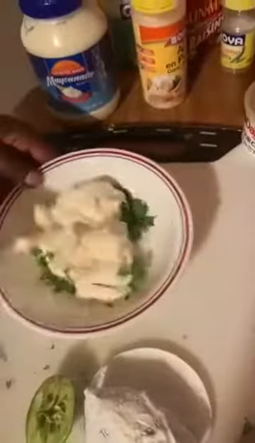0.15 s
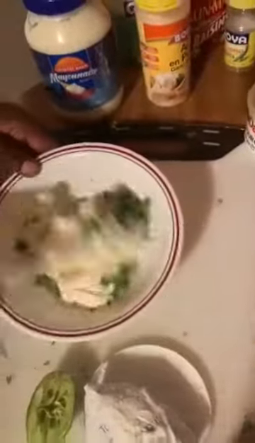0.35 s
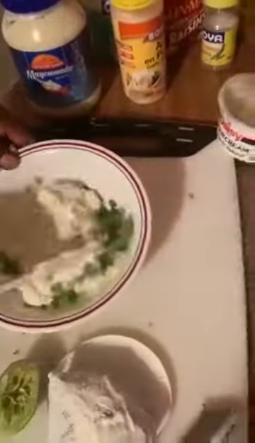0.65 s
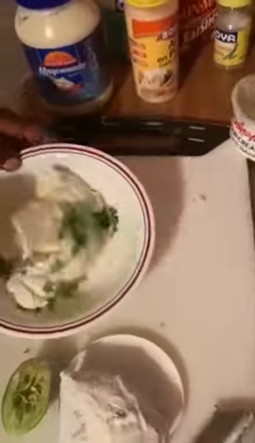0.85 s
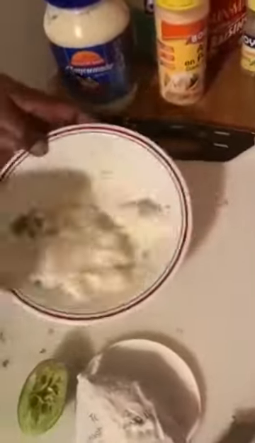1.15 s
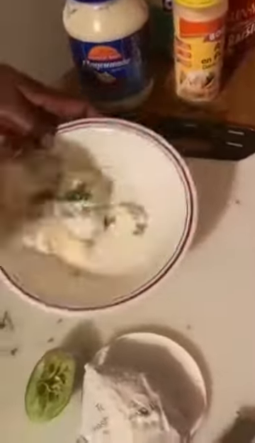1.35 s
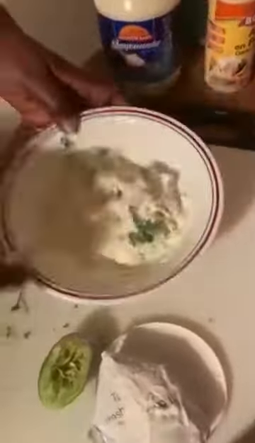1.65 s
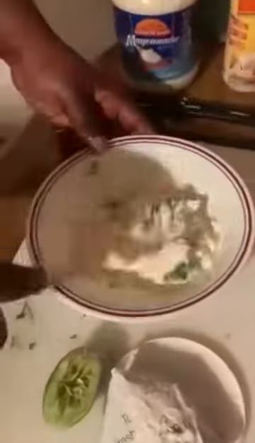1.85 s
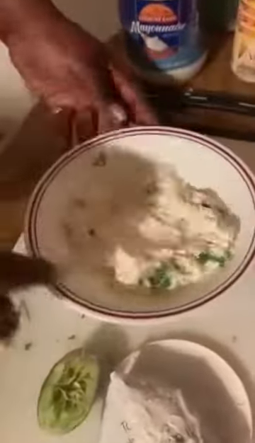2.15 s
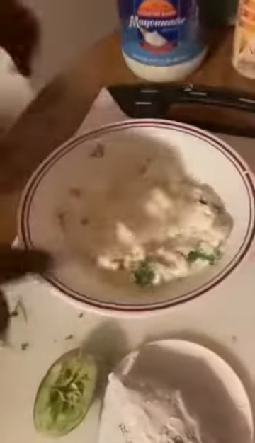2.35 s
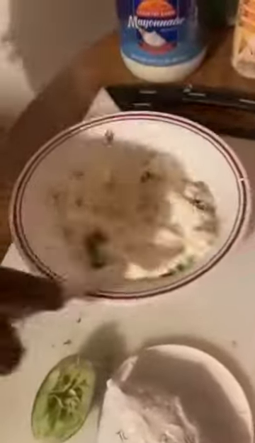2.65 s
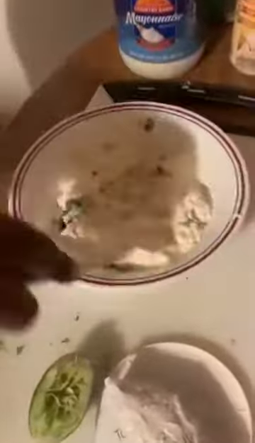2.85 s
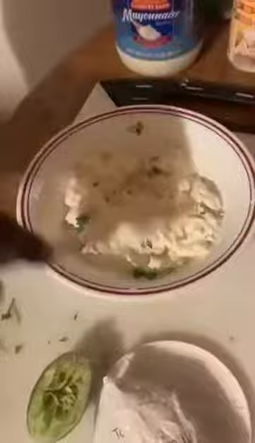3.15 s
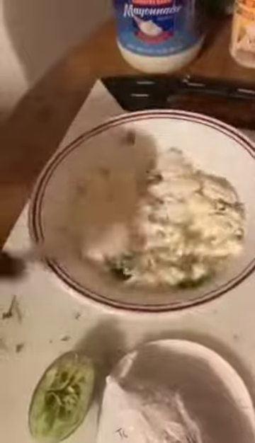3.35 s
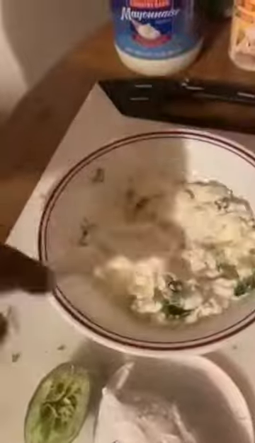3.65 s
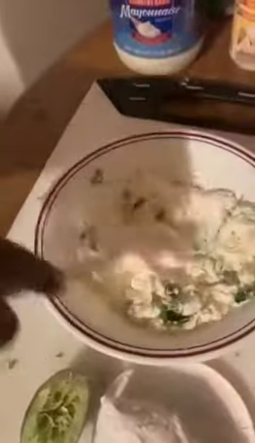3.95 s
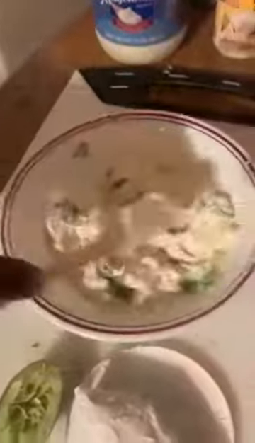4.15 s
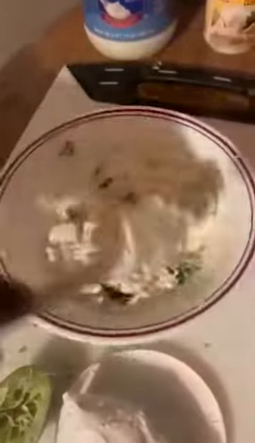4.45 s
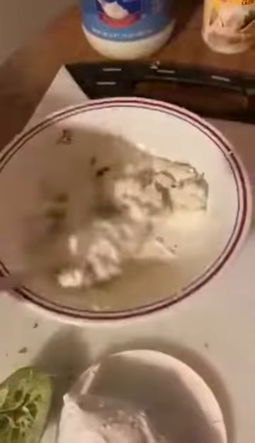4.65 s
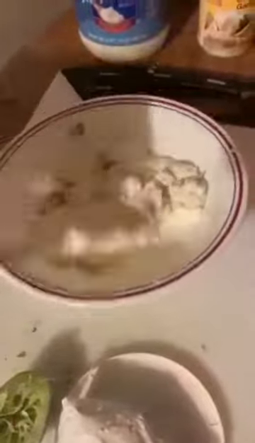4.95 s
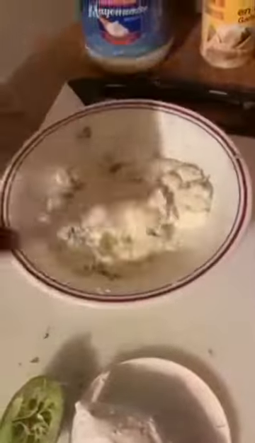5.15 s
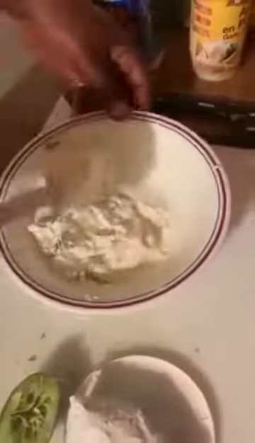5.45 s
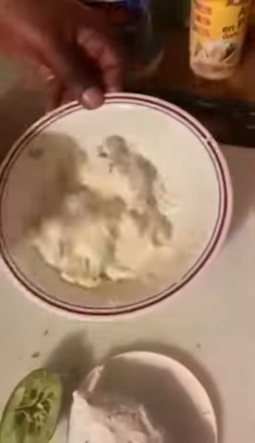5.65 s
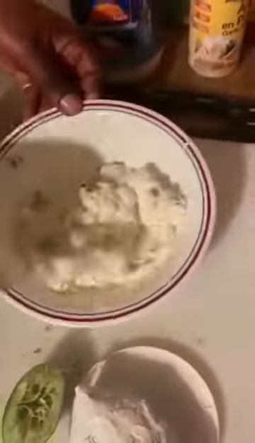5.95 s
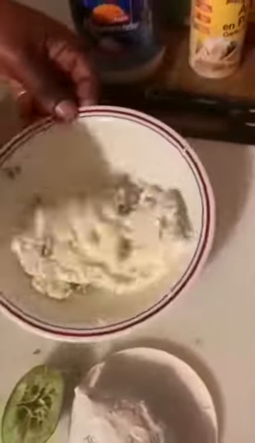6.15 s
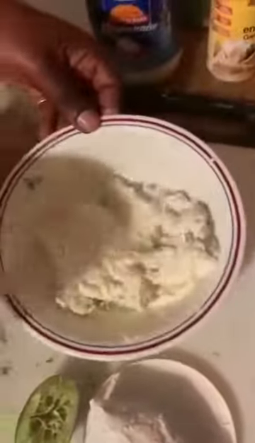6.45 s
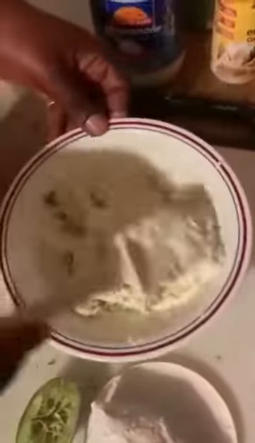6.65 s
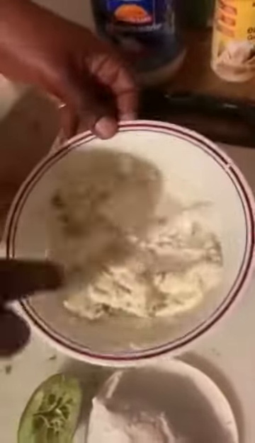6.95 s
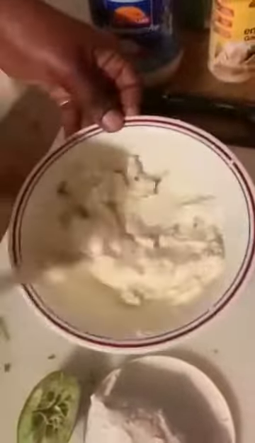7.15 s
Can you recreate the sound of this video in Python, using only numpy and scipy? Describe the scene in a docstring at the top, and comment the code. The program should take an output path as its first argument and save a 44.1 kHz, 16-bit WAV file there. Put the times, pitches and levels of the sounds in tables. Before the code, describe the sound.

A plastic spoon stirs thick creamy mixture in a ceramic bowl, wet crackles and smacks, with bowl knocks and scrapes over a faint appliance hum.

```python
"""In a small kitchen a plastic spoon stirs thick mayonnaise in a ceramic bowl, close to a camera.
An appliance hums: unsteady low tones over shaped noise. The bowl rocks and shuffles on a cutting board:
decaying modes and juddering noise. The spoon taps and scrapes the wall, exciting its damped resonances.
The cream crackles and smacks: swarms of tiny damped sines and the short ring of bursting air pockets."""
import sys
import numpy as np
from scipy import signal
from scipy.fft import rfft, irfft, next_fast_len
from scipy.io import wavfile
from scipy.ndimage import map_coordinates

SR = 44100
rng = np.random.default_rng(int(sys.argv[2]) if len(sys.argv) > 2 else 0)


def pcm_store(signal):
    """Save signal as 16-bit PCM."""
    levels = np.round(np.clip(np.atleast_2d(signal), -1, 1) * 32767)
    wavfile.write(sys.argv[1], SR, levels.astype(np.int16).T)


N = 322371
TOP_HZ = 12100  # band limit of the camera, also the highest mode of an air pocket

# resonances of the bowl wall, damped by the cream: pitch_hz, level_db, t60_s
WALL_MODES = [(1147, -6, 0.022), (1600, -4.5, 0.024), (1933, -10, 0.033), (2580, -14.5, 0.014),
              (3165, -8, 0.063), (3600, -2.5, 0.013), (4830, -3.5, 0.019), (7030, 2.5, 0.028),
              (8300, -10.5, 0.008), (10300, -2, 0.016)]
# spectrum of sheared cream: frequency_hz, density_db (per Hz, relative)
CREAM_SPECTRUM = [(350, -42), (600, -13), (807, -15), (2630, -10), (3870, -6.5), (5080, -11), (7860, -19),
                  (9780, -24), (11400, -11.5), (13000, -40.5), (16900, -71), (22000, -120)]


def amp(db):
    """Level in decibels to amplitude ratio."""
    return 10 ** (np.asarray(db) / 20)


def unit(x):
    """Normalise to an rms of 1."""
    return x / np.sqrt(np.mean(x ** 2) + 1e-20)


def along(points, hz):
    """Interpolate (Hz, value) points on a logarithmic frequency axis."""
    f, v = np.transpose(points)
    return np.interp(np.log(hz + 1), np.log(np.abs(f) + 1), v)


def wobble(rate):
    """Slow random modulation: a smooth curve through rate random knots a second."""
    knots = rng.standard_normal(int(N * rate / SR) + 4)
    return map_coordinates(knots, [np.arange(N) * rate / SR])


def filtered(x, response):
    """Linear filtering: multiply the spectrum by a response of frequency."""
    n = x.shape[-1]
    m = next_fast_len(n + 4096)
    return irfft(rfft(x, m) * response(np.fft.rfftfreq(m, 1 / SR)), m)[..., :n]


def coloured(x, spectrum):
    """Spectral shaping: weight x by (Hz, dB) points, then bring it to an rms of 1."""
    return unit(filtered(x, lambda hz: amp(along(spectrum, hz))))


def add(track, s, x):
    """Superposition: mix x into the track from time s."""
    part = track[max(round(s * SR), 0):][:len(x)]
    part += x[:len(part)]


def voiced(x, centres_hz, levels_db):
    """Contact hardness sets the spectrum: steer a short sound's band energies to given levels."""
    power = np.abs(rfft(x)) ** 2 / len(x)
    hz = np.fft.rfftfreq(len(x), 1 / SR)
    edges_hz = np.sqrt(centres_hz[:-1] * centres_hz[1:])
    band = np.searchsorted(edges_hz, hz)
    have_db = 10 * np.log10(np.bincount(band, power) / SR + 1e-20)
    gain_points = np.c_[centres_hz, levels_db - have_db]
    return filtered(x, lambda f: amp(along(gain_points, f)))


def blow(modes, crack_db, crack_t60, low_hz, high_hz, touch_db):
    """Impact excitation: a short noise swell leads into a noise crack and modes of slightly random tuning."""
    t = np.arange(-SR // 100, SR // 4) / SR  # contact at t = 0, after a 10 ms lead-in
    after = np.maximum(t, 0)
    ring = 0
    for k, (hz, db, t60) in enumerate(modes):
        decay = amp(db + rng.normal(0, 2.3) - 60 * after / t60)
        tone = np.sin(2 * np.pi * hz * rng.normal(1, 0.0072) * after)
        ring = ring + decay * tone * (-1) ** k  # neighbours start in opposite directions
    band = signal.butter(2, [low_hz, min(high_hz, SR / 2.2)], "band", fs=SR, output="sos")
    noise = signal.sosfilt(band, rng.standard_normal(len(t)))
    swell = amp(touch_db + 20 * np.minimum(t, 0) / 0.006)
    shape = np.where(t < 0, swell, amp(-60 * after / crack_t60))
    return ring + amp(crack_db) * shape * noise


def strike(track_hits):
    """Superposition of separate impacts: (s, sound) pairs, contact 1 ms after s owing to the lead-in."""
    out = np.zeros(N)
    for s, sound in track_hits:
        add(out, s - .009, sound)
    return out


def strokes(table):
    """Friction follows pressure: each (s, length s, dB) stroke swells quickly and releases slowly."""
    push = np.zeros(N)
    for s, length, db in table:
        u = np.linspace(0, 1, max(int(length * SR), 2))
        add(push, s, amp(db) * np.sin(np.pi * u ** 0.4))
    return push


def grains(per_second, centre_hz, spread, cycles, scatter_db):
    """Bubble acoustics: bursting films as damped sines of random pitch and size, at an rms of 1."""
    count = int(per_second * N / SR)
    when, size, a, b = rng.random((count, 4)).T[..., None]
    hz = np.clip(centre_hz * np.exp(spread * (a + b - 1)), 300, SR / 3)
    k = np.arange(SR // 200)
    strength = amp(scatter_db * np.minimum(-np.log(1 - size), 4))
    decay = np.exp(-hz * k / SR / cycles)
    waves = strength * np.sin(2 * np.pi * hz * k / SR) * decay
    places = (when * N).astype(int) + k
    return unit(np.bincount(places.ravel(), waves.ravel(), N)[:N])


def appliance():
    """Tonal and broadband machine noise: an unsteady motor hum, a low drone and faint air noise."""
    # motor tones: pitch_hz, level_db (rms)
    hum_tones = [(37.6, -60), (141.5, -40), (181, -55.5)]
    # spectrum of the low drone: frequency_hz, density_db (per Hz, relative)
    drone_spectrum = [(15, -9.5), (35, 1), (60, 2.5), (90, -1.5), (150, 2), (230, -1.5), (310, 1),
                      (370, -13), (480, -14), (900, -50.5)]
    # spectrum of the air noise: frequency_hz, density_db (per Hz, relative)
    air_spectrum = [(210, -26.5), (360, -0.5), (627, -7.5), (1210, -13), (3910, -30.5), (4820, -44.5),
                    (7020, -19), (9190, -52), (11300, -42), (13000, -65), (16900, -98.5), (22000, -120)]
    t = np.arange(N) / SR
    hum = 0
    for hz, db in hum_tones:
        strength = np.sqrt(2) * amp(db + 0.33 * wobble(9.1))
        hum = hum + strength * np.sin(2 * np.pi * hz * t + 0.11 * wobble(9.1))
    # each noise has a part common to both ports and a part of each port's own
    drone_noise = rng.standard_normal(N) + 0.37 * rng.standard_normal((2, N))
    air_noise = rng.standard_normal(N) + 2.84 * rng.standard_normal((2, N))
    drone = amp(-47) * coloured(drone_noise, drone_spectrum)
    air = amp(-57.5) * coloured(air_noise, air_spectrum)
    return hum + drone + air


def kitchen(x):
    """Diffuse reverberation: decaying noise, alike at both ports in the longer waves only."""
    # decay of the room: frequency_hz, t60_s
    room_decay = [(100, 0.64), (800, 0.2), (3000, 0.18), (11000, 0.062)]
    hz, t, z = signal.stft(rng.standard_normal((2, SR // 2)), SR, nperseg=256)
    decay = amp(-60 * t / along(room_decay, hz)[:, None])
    common, apart = signal.istft(z * decay, SR, nperseg=256)[1]
    apart = filtered(apart, lambda f: f / np.hypot(f, 450))
    tail = np.array([common + apart, common - apart])
    delayed = np.pad(x, (SR // 250, 0))[None]  # the room answers 4 ms late
    return signal.fftconvolve(delayed, tail / np.linalg.norm(tail[0]), axes=1)[:, :N]


def port_lead(hz):
    """Phase difference between two receivers: waves below 1 kHz reach both ports alike."""
    # lead of the left port, faded in from 1 to 2 kHz: frequency_hz, lead_rad
    lead_points = [(0, 2), (1640, 0), (2330, 1.46), (3700, 0.5), (4820, 3), (5510, 4), (6370, 0), (8010, 7),
                   (9040, 10.5), (10400, 9.5), (10900, 12), (11200, 12), (11700, 14), (12700, 16)]
    return along(lead_points, hz) * np.clip(hz / 1000 - 1, 0, 1)


def shuffles():
    """Stick-slip friction: the foot of the bowl judders briefly on the board."""
    # slides of the bowl: start_s, length_s, level_db
    slides = [(1.25, 0.067, -32.5), (1.753, 0.075, -29), (1.932, 0.1, -63), (2.99, 0.078, -38),
              (3.429, 0.061, -40), (5.008, 0.053, -24), (5.075, 0.091, -28), (5.835, 0.041, -50),
              (5.953, .04, -49.5), (6.882, 0.12, -45), (7.059, 0.19, -48.5)]
    # spectrum of the sliding foot: frequency_hz, density_db (per Hz, relative)
    slide_spectrum = [(30, -31), (70, 0), (250, 10.5), (420, -0.5), (800, 2.5), (1300, -13.5),
                      (2500, -25.5), (6000, -36)]
    judder = amp(3.5 * wobble(130))
    return strokes(slides) * unit(judder * coloured(rng.standard_normal(N), slide_spectrum))


def knocks():
    """Modal impact: the foot lands on the board and chatters once; a softer landing is duller."""
    # the bowl rocks onto the board: start_s, ring_db (bowl), thud_db (board), softness_db (lost per octave);
    # levels relative
    landings = [(1.2364, -11.5, -24.5, 2.5), (1.7639, -18, -40, 0), (1.8629, -19.5, -30.5, 13),
                (2.9782, -23.5, -26, 6.5), (3.0539, -20, -31, 10), (3.124, -23, -22, 7.5),
                (5.0184, -25, -20, 6.5), (5.0895, -50, -24.5, 11), (5.109, -26.5, -24, 16)]
    # bowl and board together: pitch_hz, level_db (relative), t60_s
    board_modes = [(72, -27, 0.22), (221, -13, 0.11), (308, -12, 0.034), (423, -8, 0.045),
                   (545, -4.5, 0.035), (642, -7, 0.035), (765, 6.5, 0.022), (890, 3, 0.022),
                   (1190, -8.5, 0.036), (1345, -2.5, 0.026), (1517, -12.5, .035), (1910, -9.5, 0.027),
                   (2440, -6.5, 0.024), (3210, -27, 0.0424)]
    # centres of the two thud bands and three ring bands: frequency_hz
    centres_hz = (70, 250, 650, 1700, 3900)
    boom_db, edge_db = -0.5, -15  # deep bass against the thud; extra loss in the top band
    bands_hz = np.array(centres_hz)
    octaves = np.log2(bands_hz[2:] / bands_hz[2])
    hits = []
    for s, ring_db, thud_db, softness_db in landings:
        hit = blow(board_modes, crack_db=12, crack_t60=.02, low_hz=600, high_hz=4400, touch_db=-15)
        chatter = blow(board_modes, crack_db=11, crack_t60=.085, low_hz=200, high_hz=3200, touch_db=-12)
        add(hit, .0075, amp(-13.5) * chatter)
        # low cut of the microphone, about 42 Hz
        hit = filtered(hit, lambda hz: hz ** 2 / np.hypot(hz ** 2, 42 ** 2))
        bowl_db = ring_db - softness_db * octaves + np.array([0, 0, edge_db])
        hits.append((s, voiced(hit, bands_hz, np.r_[thud_db + boom_db, thud_db, bowl_db])))
    return amp(-24) * strike(hits)


def scrapes():
    """Friction-driven resonance: fine slips of the spoon's edge keep the wall's modes sounding."""
    # the spoon drags along the wall: start_s, length_s, level_db (relative)
    drags = [(.56, 0.11, -47), (1.755, 0.019, -43), (1.955, 0.081, -45.5), (2.195, 0.054, -45.5),
             (3.005, 0.18, -43), (3.295, 0.052, -44), (3.425, 0.068, -49), (3.96, 0.046, -54.5),
             (4.3, 0.083, -58), (4.425, 0.041, -55), (4.842, 0.06, -46), (4.96, 0.065, -43.5),
             (5.845, 0.032, -54), (5.955, 0.041, -42.5), (6.745, 0.029, -45.5)]
    width_hz = 150  # bandwidth of each resonance
    slips = amp(9.0 * wobble(300)) * rng.standard_normal(N)

    def wall(f):
        """Sum of resonance curves, one for each mode of the wall."""
        return sum(amp(db) * 1j * f * width_hz / (hz * hz - f * f + 1j * f * width_hz)
                   for hz, db, _ in WALL_MODES)

    ringing = unit(filtered(slips, wall))
    return strokes(drags) * unit(ringing + 0.76 * coloured(slips, CREAM_SPECTRUM))


def taps():
    """Damped modal impact: the hard spoon clicks, brighter on bare wall; cream stops the ring quickly."""
    # the spoon hits the wall: start_s, level_db (relative), hardness_db (per octave)
    clicks = [(1.836, -41, 4), (1.8413, -33, 3), (1.978, -44.5, 2), (2.8762, -40, -2.5),
              (3.0037, -29.5, 0.9), (3.289, -35, -2), (3.4211, -28.5, 1.5), (3.8415, -41, 0.6),
              (4.8375, -27, 0.5), (4.9565, -24.5, 1.5)]
    # colour shared by all taps: frequency_hz, level_db
    tap_colour = [(1150, -.5), (2900, -1), (7000, 0), (11500, -7.5)]
    pivot_hz = 4000  # hardness tilts the spectrum about this frequency
    bands_hz, colour_db = np.transpose(tap_colour)
    hits = []
    for s, db, hardness_db in clicks:
        hit = blow(WALL_MODES, crack_db=13, crack_t60=.012, low_hz=750, high_hz=11000, touch_db=-13)
        tilt_db = hardness_db * np.log2(bands_hz / pivot_hz)
        hits.append((s, voiced(hit, bands_hz, db + colour_db + tilt_db)))
    return amp(-18.5) * strike(hits)


def effort(s):
    """Driving force: how hard the spoon pushes at times s, in dB over an easy stroke."""
    # stirring effort: time_s, effort_db
    stirring = [(0.0, -61.5), (0.24, -62), (0.59, -60.5), (0.85, -62), (1.14, -58), (1.73, -64.5),
                (1.89, -57), (2.83, -61), (3.2, -58.5), (3.5, -65), (4.25, -65), (4.85, -65.5),
                (5.01, -56.5), (5.21, -66.5), (5.68, -70.5), (5.86, -57.5), (6.47, -66.5), (7.31, -63)]
    easy_db = -62  # effort of an easy stroke
    return np.interp(s, *np.transpose(stirring)) - easy_db


def mashes():
    """Bubble clusters: a thick fold pressed by the spoon gives off coarse, low bubbles."""
    # the spoon mashes a fold: start_s, length_s, level_db
    presses = [(.21, 0.084, -60), (.37, 0.037, -56), (.465, 0.073, -51.5), (1.0, 0.05, -51),
               (1.08, 0.035, -55), (1.455, 0.12, -57.5), (1.91, 0.12, -56), (5.845, 0.039, -45),
               (5.955, 0.049, -50.5), (6.57, 0.096, -61.5), (6.89, 0.03, -68), (7.075, 0.03, -69)]
    bubbles = grains(per_second=700, centre_hz=1670, spread=1.04, cycles=3.3, scatter_db=2.5)
    return strokes(presses) * bubbles


def small_pockets(count=200):
    """Random bursting: a harder push makes more and louder (s, level dB, pitch Hz) pockets."""
    per_second, level_db, scatter_db = 5, -55.5, 4.5  # at an easy stroke; level relative
    centre_hz, spread_oct = 6700, 0.47
    when, luck = rng.random((count, 2)).T
    size, pitch = rng.standard_normal((count, 2)).T
    s = when * N / SR
    bursts = luck < per_second * N / SR / count * amp(effort(s))
    pocket_db = level_db + effort(s) + scatter_db * size
    pocket_hz = centre_hz * 2 ** (spread_oct * pitch)
    return np.c_[s, pocket_db, pocket_hz][bursts]


def smacks():
    """Cavity resonance: a torn air pocket rings a few cycles under a wet snap, strongest at its pitch."""
    # the larger air pockets burst: start_s, level_db (relative), pitch_hz
    large_pockets = [(.075, -46.5, 7000), (.496, -41, 6770), (.5013, -36, 1710), (.5075, -36, 4700),
                     (.5398, -39.5, 3270), (.6308, -51, 7000), (.6606, -44.5, 3300), (.7214, -48, 9500),
                     (.7813, -33, 4450), (1.101, -43, 7500), (1.1797, -44.5, 6200), (1.3624, -50.5, 7500),
                     (1.5489, -48, 8200), (2.0289, -48, 10600), (2.0486, -44.5, 7040), (2.207, -43, 8040),
                     (2.2647, -43.5, 4850), (2.3288, -32, 7800), (2.333, -38.5, 2930), (2.377, -45.5, 7600),
                     (2.4403, -36.5, 6780), (2.517, -32, 2240), (2.639, -29, 2920), (3.0988, -40.5, 4170),
                     (3.2072, -39.5, 7000), (3.2117, -32, 2460), (3.3978, -39, 7000), (3.5451, -45, 8500),
                     (3.667, -48, 4470), (3.6983, -47.5, 2180), (4.275, -36, 6660), (4.4342, -55, 2940),
                     (4.5023, -47, 7300), (4.5609, -31, 7300), (4.7162, -43, 8660), (5.0481, -40, 4700),
                     (5.3114, -53.5, 7050), (5.719, -43.5, 3570), (5.8012, -46, 8100), (5.8961, -40, 5000),
                     (5.9695, -41.5, 2000), (6.1928, -43, 2060), (6.2672, -31, 10450),
                     (6.7587, -48.5, 5800), (6.8024, -46.5, 5100), (6.8218, -43.5, 3130),
                     (7.0301, -43.5, 7450), (7.1577, -48.5, 8140), (7.2555, -46.5, 5000),
                     (7.298, -40.5, 2520)]
    # modes of an air pocket: multiple (of its pitch), level_db (relative), t60_s
    pocket_modes = [(.55, -5.5, 0.0065), (1, 1, 0.0081), (1.9, -7.5, .006)]
    # centres of the bands of a smack: frequency_hz
    centres_hz = (1150, 2900, 7000, 11500)
    below_db, above_db = 10, 10  # fall per octave either side of the pitch
    film_db = -5.5  # extra loss in the top band
    bands_hz = np.array(centres_hz)
    hits = []
    for s, db, pitch_hz in [*large_pockets, *small_pockets()]:
        cavity = [(min(multiple * pitch_hz, TOP_HZ), level, t60) for multiple, level, t60 in pocket_modes]
        hit = blow(cavity, crack_db=8, crack_t60=0.011, low_hz=1010, high_hz=12000, touch_db=-10.5)
        octaves = np.log2(bands_hz / pitch_hz)
        fall_db = np.maximum(-below_db * octaves, above_db * octaves)
        hits.append((s, voiced(hit, bands_hz, db - fall_db + np.array([0, 0, 0, film_db]))))
    return amp(-21.5) * strike(hits)


def cream():
    """Shear of a thick medium: folds squelch and films crackle over a soft smear, all growing with effort."""
    t = np.arange(N) / SR
    effort_db = effort(t)
    clumps_db = 2 * wobble(8) + 3.3 * wobble(22) + 2 * wobble(110)  # the cream lets go in fits
    folds = grains(per_second=450, centre_hz=2300, spread=.9, cycles=3, scatter_db=4.2)
    films = grains(per_second=1000, centre_hz=7170, spread=0.71, cycles=3.1, scatter_db=5.0)
    smooth = coloured(rng.standard_normal(N), CREAM_SPECTRUM)
    smoothing_db = 0.95 * t  # the crackle fades as the mixture is worked smooth
    # level at an easy stroke, then dB gained per dB of effort
    squelch = amp(-68.5 + 1.28 * effort_db + clumps_db) * folds
    crackle = amp(-60 + 1.25 * effort_db - smoothing_db + clumps_db) * films
    smear = amp(-75.5 + 1.6 * effort_db + 0.89 * clumps_db) * smooth
    return squelch + crackle + smear


def scene():
    """Direct and diffuse field: the bowl reaches two ports with a phase difference, then fills the room."""
    # microphone colour applied to the spoon's sound: frequency_hz, level_db
    microphone_colour = [(7800, -1.5), (8700, 0), (9600, -28.5), (10800, -5), (12000, -11)]
    # lead of the left port for wall contacts: frequency_hz, lead_rad
    wall_lead = [(500, .1), (1100, .45), (2000, 1.1), (4000, 1.45), (5700, 2), (7500, 1.75), (12000, .9)]
    wall_left_db = 0.3  # the spoon meets the wall on the left: raised there, lowered on the right
    foot = knocks() + shuffles()
    wet = smacks() + mashes() + cream()
    spoon = filtered(taps() + scrapes(), lambda hz: amp(along(microphone_colour, hz)))
    sides = np.array([[1], [-1]])  # left, right
    direct = filtered(foot + wet, lambda hz: np.exp(.5j * sides * port_lead(hz)))
    spoon_pair = filtered(spoon, lambda hz: np.exp(.5j * sides * along(wall_lead, hz)))
    direct += amp(sides * wall_left_db) * spoon_pair
    room = kitchen(amp(-12.5) * foot + amp(-18.0) * spoon + amp(-17) * wet)
    balance_db = [[-.7], [.7]]  # left, right
    return (direct + room + appliance()) * amp(balance_db)


def record(dry):
    """Saturation and band limiting: the camera rounds the hardest peaks and cuts steeply above its limit."""
    rounded = dry / (1 + np.abs(dry / .85) ** 6) ** (1 / 6)
    return filtered(rounded, lambda hz: 1 / np.sqrt(1 + (hz / TOP_HZ) ** 80))


dry = scene()
out = record(dry)
pcm_store(out)
```